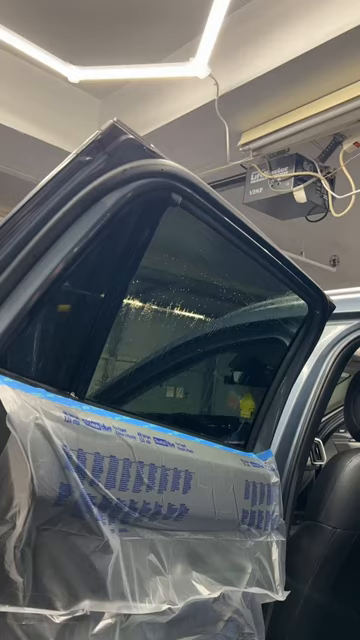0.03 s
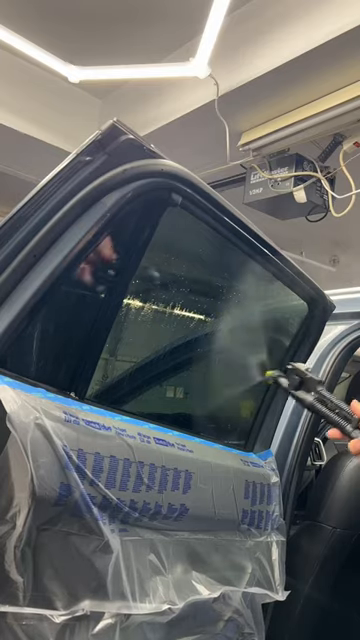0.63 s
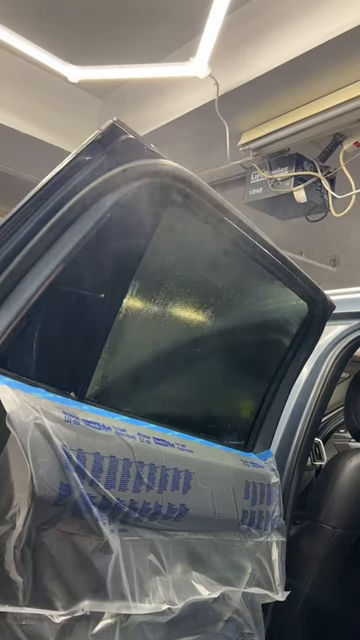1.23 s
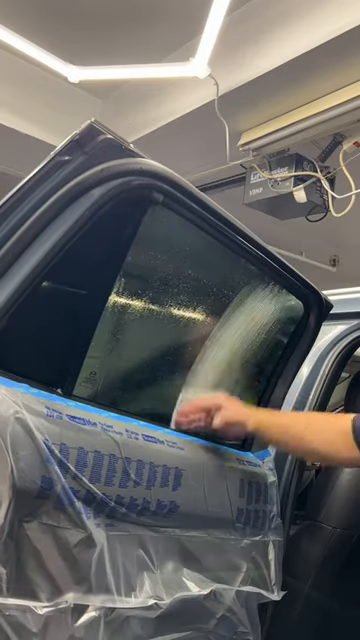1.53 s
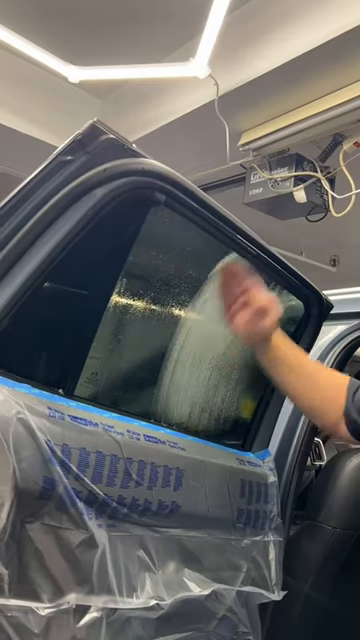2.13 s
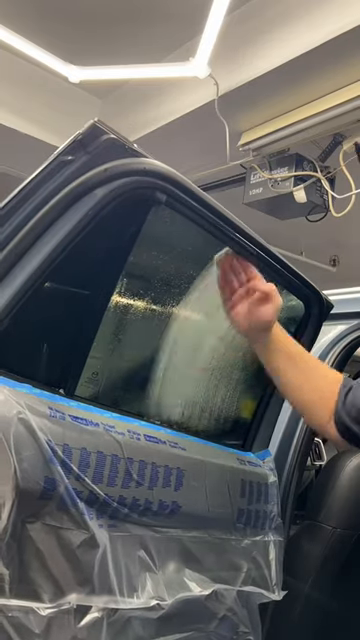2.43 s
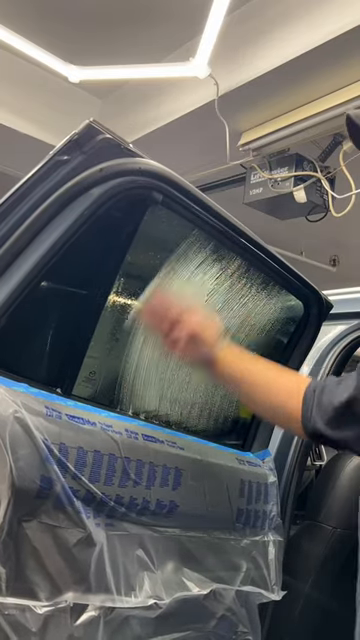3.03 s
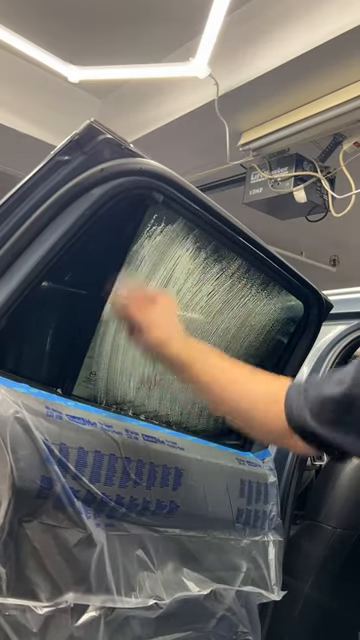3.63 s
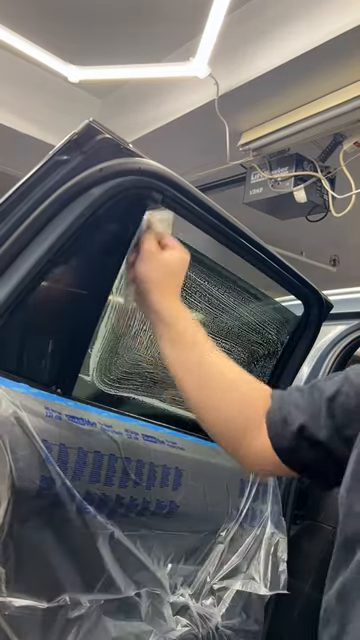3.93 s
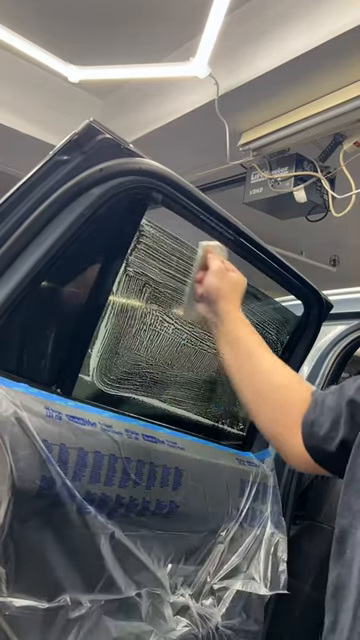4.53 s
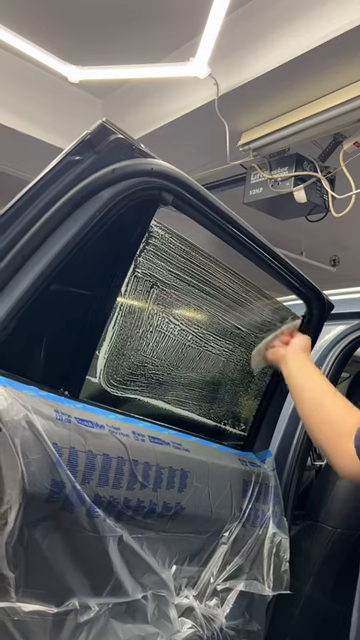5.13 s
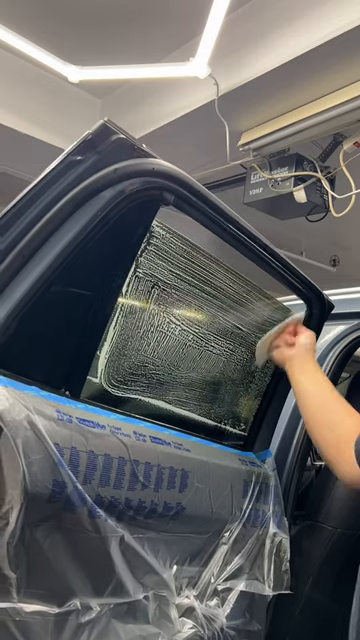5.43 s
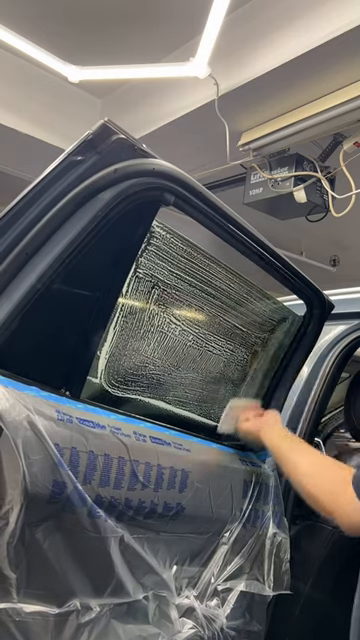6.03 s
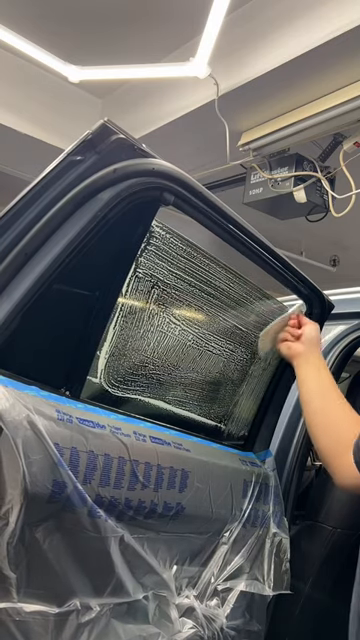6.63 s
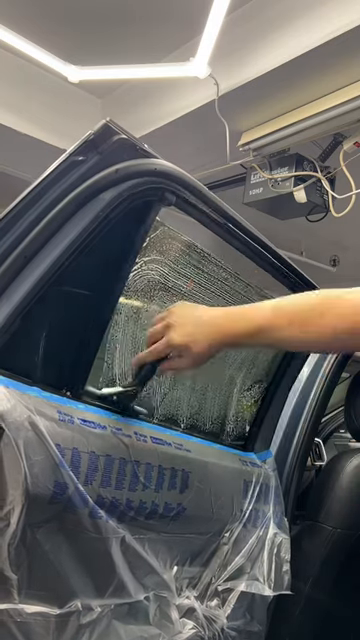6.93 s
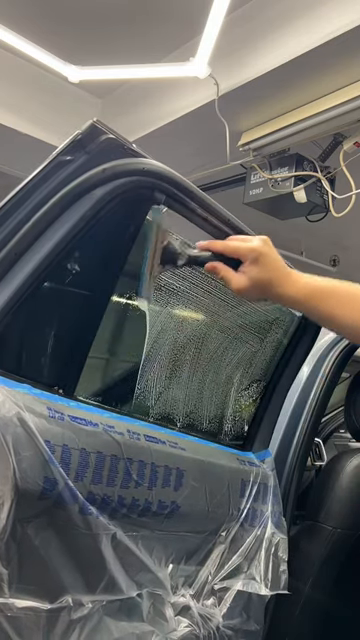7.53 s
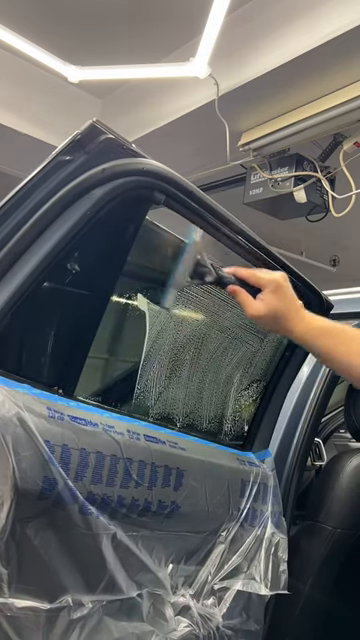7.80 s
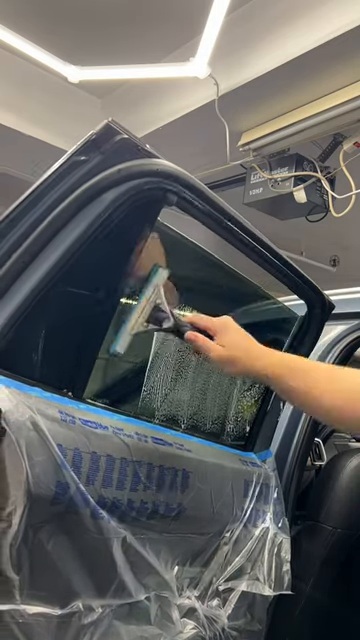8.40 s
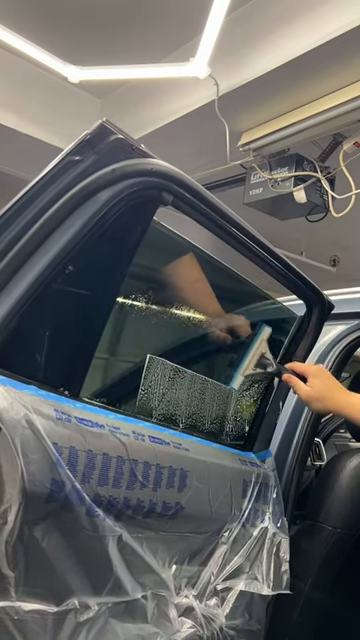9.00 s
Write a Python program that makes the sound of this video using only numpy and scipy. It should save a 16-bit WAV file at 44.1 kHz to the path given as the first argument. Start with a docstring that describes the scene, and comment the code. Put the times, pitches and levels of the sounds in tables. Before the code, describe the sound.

A sprayer hisses on a car window, a pad scrubs and knocks the wet glass, then a rubber squeegee squeaks and chatters over ventilation hum.

```python
"""A soft rustle, then the hiss of a pump sprayer misting a car's side window: a workshop, the phone a metre off.
A pad scrubs the wet pane, knocking the glass at the ends of strokes and fizzing along the seals,
and the door rumbles under the hand. Then a rubber squeegee sticks and slips, squeaking and chattering.
Faint falling whistles, ventilation and mains hum lie underneath; two microphone ports give the stereo."""
import sys
import numpy as np
from scipy import signal
from scipy.fft import rfft, irfft
from scipy.io import wavfile
from scipy.ndimage import uniform_filter1d

SR = 44100
rng = np.random.default_rng(int(sys.argv[2]) if len(sys.argv) > 2 else 0)


def output_pcm(signal):
    """Save a mono or channel-first signal as 16-bit PCM at the path in sys.argv[1].

    Samples are clipped to [-1, 1] before scaling.
    """
    pcm = np.clip(np.atleast_2d(signal).T, -1, 1) * 32767
    wavfile.write(sys.argv[1], SR, np.round(pcm).astype(np.int16))


N = 408366
T = np.arange(N) / SR

# spectra, each (frequency [Hz], relative level [dB])
AIR_COLOUR = [(25, -13), (70, -1.5), (180, -3), (300, -11.5), (500, -15), (750, -21.5), (2100, -25.5),
              (3200, -36.5), (4500, -42.5), (5800, -39.5), (8300, -50.5), (16000, -69)]  # ventilation
MIST_COLOUR = [(120, -18), (200, 0), (330, 0), (650, -5), (1300, -4), (2100, -3), (2700, -6), (3700, -12),
               (5500, -12.5), (7000, -16.5), (8400, -13), (16000, -18)]  # spray on the pane
RUB_COLOUR = [(250, 2), (600, 1.5), (1000, 1), (1550, 2), (1900, -2.5), (2400, -1), (4000, -6),
              (6000, -9.5), (9000, -50)]  # friction on wet glass
FIZZ_COLOUR = [(1500, -25.5), (3200, 0), (4300, 0), (5600, -0.5), (7000, -4), (8400, 1.5), (10000, -20.5),
               (16000, -23.5)]  # tearing soap film
SHAKE_COLOUR = [(20, -28), (40, -12.5), (58, 6.5), (85, 3.5), (120, -6.5), (190, -5), (300, -11),
                (500, -25.5), (1000, -84)]  # door shaking under the hand
BOOM_COLOUR = [(40, -6), (65, 9), (130, 7), (215, -6), (310, -12), (420, 2), (600, -18.5), (1500, -58)]  # hollow door after a knock
TICK_COLOUR = [(200, 2), (600, 14), (1200, 8.5), (2000, 2.5), (3000, -3), (4200, -4.5), (5500, -13),
               (9000, -20), (16000, -39)]  # sharp edge of a knock
SLIP_COLOUR = [(400, 10.5), (1000, -3.5), (1700, 8.5), (2300, 14), (3000, 12), (3900, -7), (4600, -1),
               (5100, 8), (5700, -5.5), (12000, -45)]  # one slip of the rubber lip
JUDDER_COLOUR = [(250, -10), (520, -1.5), (850, -24.5), (1250, 1.5), (1700, 4.5), (2050, -11.5),
                 (2500, -4.5), (3200, -14), (3900, -26), (4600, -21), (8000, -55)]  # resonances of the wet blade
TOP_HISS_COLOUR = [(7500, -30), (11500, 0), (16000, -1)]
RUSTLE_COLOUR = [(500, 9.5), (1400, 4), (2500, -6), (6000, -13.5), (12000, -29)]
DRUMMING_SHARE = [(2800, 5.3), (7000, 1.8)]  # droplets against the mist
AIR_WIDTH = [(60, -16), (250, -23.0), (600, -3.0), (1500, 4.5)]  # side against mid
# mains hum and fan whine: (frequency [Hz], level [dB])
HUM_TONES = [(60, -53.5), (1000, -57), (1479, -57), (1907, -56)]
# shading between the microphone ports: (frequency [Hz], left minus right [dB])
PORT_BALANCE = [(100, 3), (500, -0.1), (1200, 3), (2200, 3), (4200, 3.5), (6000, 7.5), (8000, 1),
                (16000, -0.5)]
# delay between the ports: (frequency [Hz], phase lead of the left [rad])
PORT_PHASE = [(150, -0.12), (600, -0.79), (1400, -0.94), (2700, 0.93), (6000, 1), (8500, 1), (12000, 1)]
# reflections off door, floor, ceiling and car body: (delay [s], level [dB])
REFLECTIONS = [(0.0098, -14.5), (0.022, -20), (.035, -16), (0.048, -23)]
# thin whistles: (start [s], length [s], settled pitch [Hz], level [dB], starts higher by [share])
WHISTLES = [(0.015, 0.051, 2210, -45, 0.047), (0.858, 0.3, 2150, -47.5, 0.31),
            (1.288, 0.1, 2170, -47.5, 0.32), (1.492, 0.13, 2210, -47, 0.18),
            (2.39, 0.13, 2450, -46.5, 0.24), (2.84, 0.11, 4700, -59, 0.072), (3.16, 0.095, 2620, -54, 0.16),
            (3.428, 0.14, 2560, -49, .2), (6.879, 0.15, 2760, -46.5, 0.22),
            (7.043, 0.058, 3610, -49.5, 0.01), (7.113, 0.17, 2710, -44, 0.19),
            (7.461, 0.2, 2686, -45, 0.35), (7.731, 0.28, 3610, -49.5, 0.048), (7.81, 0.17, 2760, -46, 0.24),
            (8.384, 0.24, 2460, -46.5, 0.15)]
# scrubbing along the seals: (start [s], length [s], level [dB], top hiss against that level [dB])
PAD_STROKES = [(3.269, 0.16, -46.5, -5.5), (3.53, 0.13, -46, -1.5), (3.642, 0.19, -42.5, -5),
               (3.828, 0.13, -41, -7.5), (3.987, .14, -40.5, -5.5), (4.219, 0.78, -43, -7.5),
               (5.02, 0.16, -46.5, -26), (5.215, 0.12, -43.5, -20), (5.362, 0.14, -47.5, -28.5),
               (5.514, 0.14, -45, -22.5), (5.687, 0.22, -42, -23), (5.794, 0.17, -31, -4.5),
               (5.984, 0.22, -35.5, -10), (6.284, 0.14, -45.5, -30.5), (6.422, 0.073, -46, -39),
               (6.493, 0.081, -45.5, -38), (6.576, 0.35, -49, -21), (6.692, 0.2, -42.5, -4)]
# the pad groans in the corner of the pane: (start [s], length [s], level [dB])
PAD_GROANS = [(6.611, 0.073, -25), (6.766, 0.011, -18), (6.788, 0.066, -25.5)]
# the pad wedges in the corner and bumps the frame: (time [s], level [dB])
FRAME_BUMPS = [(6.642, -16), (6.652, -25), (6.727, -15)]
# modes of the window frame and of the pane in its door: (frequency [Hz], level [dB], t60 [s])
FRAME_MODES = [(361, 2, 0.12), (438, 0, .14), (545, 4.5, 0.14), (637, -4, 0.1), (1050, -13, .05),
               (1280, -13.5, 0.1), (1474, -12, 0.058)]
PANE_MODES = [(59.6, -5, 0.35), (88, 5, 0.19), (124.2, -2, 0.11), (171, 0.5, 0.3), (219.3, -0.5, 0.24),
              (287.7, -0.5, 0.31), (361, 5.5, 0.065), (427, 2.5, 0.12), (563, 11, 0.037), (1022, -9, 0.091)]
# knocks on the pane: (time [s], level [dB], first pitch [Hz], length [s], tick level [dB])
PANE_KNOCKS = [(1.263, -13, 152, 0.039, -60), (1.423, 1, 338, 0.046, -15.5), (1.459, -5.5, 147, 0.018, -53),
               (1.568, -13.5, 233, 0.068, -26.5), (1.696, -0.5, 451, 0.043, -18),
               (1.735, -1, 158, 0.015, -43), (1.959, 0.5, 434, 0.039, -16.5), (1.998, -3, 168, 0.0091, -36),
               (2.099, -9.5, 318, 0.049, -22.5), (2.231, 0.5, 269.6, 0.044, -19),
               (2.27, -4, 155, 0.013, -38), (2.376, -10.5, 298, 0.043, -22.5),
               (2.509, -1.5, 229, 0.021, -23.5), (2.775, 1.5, 234, 0.015, -23.5),
               (3.052, -0.5, 234, 0.016, -28), (3.478, -11, 434, 0.052, -19.5),
               (4.05, -17.5, 486, 0.035, -47), (5.952, -2.5, 583, 0.016, -12.5),
               (5.959, -2, 391, 0.022, -40), (6.657, -3.5, 360, 0.0099, -59), (6.73, -0.5, 388, 0.015, -41),
               (7.514, -18, 248, 0.054, -34), (9.153, -9, 518, 0.01, -16), (9.163, -13, 336, 0.046, -13.5)]
# pulls of the squeegee: (start [s], length [s], fizz level [dB], rub level [dB])
BLADE_PULLS = [(7.07, 0.343, -49, -55), (7.442, 0.55, -54, -52.5), (7.95, 0.27, -52, -41.5),
               (8.375, 0.315, -52, -39.5), (8.638, 0.567, -55.5, -36), (9.165, 0.11, -58, -38.5)]
# the blade's lip catches and snaps free: (time [s], level [dB])
BLADE_SLIPS = [(7.5037, -35), (8.19, -29), (8.6614, -18.5), (8.7174, -21), (8.737, -16), (8.779, -16),
               (8.813, -21), (8.862, -14.5), (8.904, -23.5), (8.9396, -17), (8.9597, -12), (9.023, -15.5),
               (9.0457, -18)]
# runs of quick slips: (start [s], length [s], level [dB])
BLADE_JUDDERS = [(7.352, 0.033, -39), (8.196, 0.031, -26), (8.216, .03, -28), (8.707, 0.37, -38.5),
                 (8.971, 0.17, -32.5)]
# pad and blade: (start [s], length [s], first pitch [Hz], last pitch [Hz], level [dB], roughness [0-1])
SQUEAKS = [(4.522, .025, 1410, 1265, -40, .12), (4.647, 0.27, 2070, 1967, -51.5, 0.05),
           (5.349, .012, 2640, 2280, -40, .08), (7.348, 0.023, 1850, 1870, -32.5, .03),
           (7.369, 0.07, 1770, 1690, -32.5, 0.08), (7.84, 0.034, 3940, 3840, -38.5, 0.04),
           (8.187, 0.033, 1522, 1583, -24, .06), (8.694, 0.036, 3000, 3060, -33, 0.03),
           (8.717, 0.054, 3050, 2750, -35.5, 0.1), (8.791, 0.038, 2634, 2640, -32, .09),
           (8.832, 0.2, 1707, 1606, -39, 0), (8.979, 0.063, 2530, 2400, -29, 0.13),
           (9.035, .05, 1457, 1500, -33, 0.13), (9.036, 0.047, 2984, 3075, -28, 0.04),
           (9.09, 0.029, 1500, 1445, -26.5, 0.07)]

PAD_ON_S, SPREAD_END_S, PAD_OFF_S = 1.23, 3.66, 6.9  # the pad lands, has spread the soap, lifts off


def undb(db):
    """Decibels to gain."""
    return 10 ** (np.asarray(db) / 20)


def unit(x):
    """Scale to rms 1."""
    return x / np.sqrt(np.mean(x ** 2))


def by_frequency(points):
    """Join (Hz, value) points over all frequencies."""
    hz, value = np.transpose(points)
    return np.interp(np.log(np.fft.rfftfreq(N, 1 / SR) + 1), np.log(hz), value)


def equalise(x, points):
    """Filter x through (Hz, dB) points."""
    return irfft(rfft(x) * undb(by_frequency(points)), N)


def colour(x, points):
    """Give x a spectrum, at rms 1."""
    return unit(equalise(x, points))


def noise(points):
    """Noise with the given spectrum, at rms 1."""
    return colour(rng.standard_normal(N), points)


def lowpass(x, hz):
    """Take off the treble."""
    return signal.sosfilt(signal.butter(2, hz, fs=SR, output="sos"), x)


def walk(hz):
    """Smooth random drift at rms 1, changing about hz times a second."""
    return unit(lowpass(rng.standard_normal(N + SR), hz)[SR:])


def grains(per_s, spread_db):
    """Tiny impacts at random moments, of varying size."""
    hits = rng.random(N) < per_s / SR
    return unit(hits * rng.standard_normal(N) * undb(spread_db * rng.standard_normal(N)))


def crack(grit, t60):
    """A random stretch of the noise grit that starts sharply and dies away."""
    t = T[:SR // 10]
    return np.roll(grit, -rng.integers(N))[:len(t)] * undb(-60 * t / t60) * (1 - np.exp(-t / 0.0002))


def gate(start, end, attack, release):
    """Rise from start, hold, and fall to nothing at end."""
    return np.clip((T - start) / attack, 0, 1) * np.clip((end - T) / release, 0, 1)


def add(track, s, sound):
    """Mix a sound in at time s."""
    i = max(int(s * SR), 0)
    track[i:i + len(sound)] += sound[:max(N - i, 0)]


def ventilation(air_db=-35):
    """Room tone: steady air noise, centred in the bass, with mains hum and a wavering fan whine."""
    mid = noise(AIR_COLOUR)
    side = equalise(noise(AIR_COLOUR), AIR_WIDTH)
    hum = np.zeros(N)
    for hz, db in HUM_TONES:
        pitch = hz * (1 + 0.023 * walk(62.2))
        hum += undb(db) * np.sqrt(2) * np.sin(2 * np.pi * np.cumsum(pitch) / SR)
    return undb(air_db) * (mid + np.array([side, -side])) + hum


def workshop(x, t60=0.11, treble_t60=0.25):
    """Short diffuse echo of the room, different on each side of the microphone."""
    t = T[:SR * 2 // 3]
    white = rng.standard_normal((2, len(t)))
    low = lowpass(white, 2600)
    tail = low * undb(-60 * t / t60) + (white - low) * .5 * undb(-60 * t / treble_t60)
    tail *= np.clip(t / 0.0045, 0, 1)
    tail /= np.sqrt(np.sum(tail ** 2, axis=1, keepdims=True))
    return signal.fftconvolve(x[None], tail, axes=1)[:, :N]


def rustle(db=-38):
    """Soft handling noise before the spray."""
    swell = gate(start=0.029, end=0.344, attack=0.044, release=0.082)
    return undb(db) * swell * noise(RUSTLE_COLOUR) * undb(1.8 * walk(34))


def door(spreading, rubbing, lag_s=0.44):
    """The open door rumbles as the hand works on it, too heavy to follow each stroke."""
    leverage_db = 0.5 * (T - PAD_ON_S)  # grows as the pad climbs the pane
    push = undb(-29 + leverage_db) * spreading + undb(14) * rubbing
    resting = undb(-32.5)
    shake = np.hypot(resting, uniform_filter1d(push, int(lag_s * SR)))
    return noise(SHAKE_COLOUR) * shake * undb(1.43 * walk(14.4) - 2.0)


def frame(contact_s=0.0024):
    """Soft bumps of the pad in the corner ring the window frame with a hollow clunk."""
    out, t = np.zeros(N), T[:SR // 4]
    for s, db in FRAME_BUMPS:
        detune = 1 + .02 * rng.standard_normal(len(FRAME_MODES))
        ring = sum(undb(mode_db - 60 * t / t60) * np.sin(2 * np.pi * hz * d * t)
                   for (hz, mode_db, t60), d in zip(FRAME_MODES, detune))
        add(out, s, undb(db) * ring * (1 - np.exp(-t / contact_s)))
    return out


def flecks():
    """Single drops and bubbles snap brightly out of the wet pad."""
    drops = grains(per_s=70, spread_db=3)
    snaps = signal.fftconvolve(drops, crack(rng.standard_normal(N), t60=.012))[:N]
    return undb(-9) * colour(snaps, [(2000, -21), (5500, 5), (8500, -0.5), (16000, 0)])


def chirps(count=400, per_s=45, centre_hz=2087, spread_oct=.4, t60=0.065):
    """Single pockets of liquid pop under the pad and ring briefly, each at its own pitch."""
    out, t = np.zeros(N), T[:SR // 20]
    ring = undb(-60 * t / t60) * (1 - np.exp(-t / 0.0051))
    chance = rng.standard_normal((count, 2))
    times = PAD_ON_S + np.cumsum(rng.exponential(1, count)) / per_s
    for s, (pitch, size) in zip(times, chance):
        hz = min(centre_hz * 2 ** (spread_oct * pitch), SR / 3)
        add(out, s, undb(2.2 * size) * ring * np.sin(2 * np.pi * hz * t))
    return undb(-9) * unit(out)


def eased(gain, ease_s=0.029):
    """The hand cannot start or stop at once."""
    width = int(ease_s * SR)
    return uniform_filter1d(uniform_filter1d(gain, width), width)


def pad_strokes(resting_db=-60.5, spreading_db=-57):
    """The pad spreads the soap, then scrubs: gains of spreading, fizz, rub and top hiss."""
    spreading = gate(PAD_ON_S, SPREAD_END_S, 0.019, 0.13)
    fizz = undb(resting_db) * gate(PAD_ON_S, PAD_OFF_S, 0.019, .02) + undb(spreading_db) * spreading
    rub, hiss = fizz, undb(-12.5) * fizz
    for s, length, db, hiss_db in PAD_STROKES:
        stroke = undb(db) * gate(s, s + length, attack=0.03, release=0.034)
        fizz = np.maximum(fizz, stroke)
        rub = np.maximum(rub, stroke * undb(-2.5 - 0.39 * hiss_db))  # strokes with more top hiss rub less
        hiss = np.maximum(hiss, stroke * undb(hiss_db))
    return spreading, eased(fizz), eased(rub), eased(hiss)


def blade_pulls(first_db=-7.5):
    """The squeegee speeds up through each pull: gains of fizz and rub."""
    fizz, rub = np.zeros(N), np.zeros(N)
    for s, length, fizz_db, rub_db in BLADE_PULLS:
        speed = undb(first_db * np.clip(1 - (T - s) / (1.01 * length), 0, 1))
        pull = speed * gate(s, s + length, attack=0.03, release=0.029)
        fizz += undb(fizz_db) * pull
        rub += undb(rub_db) * pull
    return fizz, rub


def sliding(fizz_gain, rub_gain, hiss_gain):
    """Fibres catch on the glass and the soap film tears into fizz; both grow with the hand's speed."""
    catches = colour(grains(per_s=7000, spread_db=-2.0), RUB_COLOUR)
    # pockets of liquid ring briefly at a wandering pitch
    pocket_swell = lowpass(rng.standard_normal(N), 86)
    pocket_hz = 1950 * np.exp(0.099 * walk(3.1))
    pockets = unit(pocket_swell * np.sin(2 * np.pi * np.cumsum(pocket_hz) / SR))
    rub = (catches + undb(-14) * pockets) * undb(1.3 * walk(21.0))
    # now and then a bigger bubble snaps
    bubbles = grains(per_s=12000, spread_db=3) + .22 * grains(per_s=30, spread_db=3)
    fizz = colour(bubbles, FIZZ_COLOUR) * undb(1.1 * walk(35) - 0.25)
    # hard strokes add a fine hiss of tiny bursts high in the treble
    hiss = colour(grains(per_s=9000, spread_db=3) + .4 * bubbles, TOP_HISS_COLOUR)
    hiss *= undb(1.2 * walk(30) + walk(5) - .4)
    return rub_gain * rub + fizz_gain * fizz + undb(4.0) * hiss_gain * hiss


def unsteady_tone(s, hz, rough, jitter, grip, flutter_db=4, overtone=0, skew=1):
    """One swelling tone at rms 1: jitter shakes its pitch, grip its level; a skew under 1 bites early."""
    progress = np.arange(len(hz)) / len(hz)
    here = (int(s * SR) + np.arange(len(hz))) % N
    phase = 2 * np.pi * np.cumsum(hz * (1 + rough * jitter[here])) / SR
    wave = np.sin(phase) + overtone * np.sin(2 * phase)
    swell = np.sin(np.pi * progress ** skew) ** .5
    return unit(wave * undb(flutter_db * grip[here]) * swell)


def whistles(jitter, grip, settle_s=.055, creep_per_s=.35, first_rough=.085, settled_rough=.042):
    """Each faint whistle starts high and hoarse and clears as it settles, with a slow upward creep."""
    out = np.zeros(N)
    for s, length, hz, db, higher in WHISTLES:
        t = T[:int(length * SR)]
        unsettled = np.exp(-t / settle_s)
        pitch = hz * (1 + higher * unsettled + creep_per_s * t)
        rough = settled_rough + (first_rough - settled_rough) * unsettled
        add(out, s, undb(db) * unsteady_tone(s, pitch, rough, jitter, grip, flutter_db=3))
    return out


def squeaks(jitter, grip, damp_hz=1810, groan_hz=289.3, groan_rough=0.21):
    """Rubber and pad stick and slip on the glass: high squeaks, and low groans in the corner."""
    out = np.zeros(N)
    for s, length, first_hz, last_hz, db, rough in SQUEAKS:
        glide = np.linspace(first_hz, last_hz, int(length * SR))
        overtone = undb(-13) * min(damp_hz / first_hz, 1) ** 2  # soft rubber damps the higher overtones
        add(out, s, undb(db) * unsteady_tone(s, glide, rough, jitter, grip, overtone=overtone, skew=0.71))
    for s, length, db in PAD_GROANS:
        pitch = np.full(int(length * SR), groan_hz)
        add(out, s, undb(db) * unsteady_tone(s, pitch, groan_rough, jitter, grip, overtone=undb(-10.5)))
    return out


def judder():
    """Runs of uneven slips rasp through the resonances of the wet blade."""
    out = np.zeros(N)
    releases = grains(per_s=900, spread_db=-5)
    slips = signal.fftconvolve(releases, crack(rng.standard_normal(N), t60=0.017))[:N]
    rasp = colour(unit(slips) + grains(per_s=5000, spread_db=1), JUDDER_COLOUR)
    for s, length, db in BLADE_JUDDERS:
        run = rasp[int(s * SR):][:int(length * SR)]
        add(out, s, undb(db) * unit(run * np.hanning(len(run)) ** 0.4))
    return out


def chatter(blade_hz=5250):
    """Single slips of the lip click against the glass and set the blade ringing."""
    out, grit = np.zeros(N), noise(SLIP_COLOUR)
    blade = noise([(0.65 * blade_hz, -25), (blade_hz, 0), (1.27 * blade_hz, -25), (16000, -50)])
    for s, db in BLADE_SLIPS:
        add(out, s - .001, undb(db - 3.5) * crack(grit, t60=.036))
        add(out, s, undb(db - 25) * crack(blade, t60=0.075))
    return out


def sprayer(open_s=0.3368, shut_s=0.7596, db=-21, first_hit_s=0.342, sweep_s=0.1286):
    """The nozzle hisses while the valve is open; droplets drum on the glass."""
    valve = np.clip((T - open_s) / 0.015, 0, 1) * np.exp(-np.maximum(T - shut_s, 0) / 0.0057)
    mist = colour(rng.standard_normal(N) + grains(per_s=12000, spread_db=1), MIST_COLOUR)
    # the drumming swells as the jet hits the pane squarely, once in each sweep of the hand
    drumming = equalise(mist, DRUMMING_SHARE)
    sweep = undb(1.5 * np.cos(2 * np.pi * (T - first_hit_s) / sweep_s))
    return valve * undb(db) * (mist + drumming * (sweep - 1))


def knocks(boom_db=-12, boom_t60=0.57):
    """Each knock sends a bending wave through the pane: high notes come first, then pane and door ring."""
    waves, body, t = np.zeros(N), np.zeros(N), T[:SR // 2]
    grit, smear = noise(TICK_COLOUR), walk(102)
    for s, db, first_hz, length, tick_db in PANE_KNOCKS:
        age = T[:int(length * SR)]
        period_growth = 0.1762 * (length / 0.0536) ** 0.45  # s per s, faster after a longer push
        hz = 1 / (1 / first_hz + period_growth * age)
        swell = np.sin(np.pi * (age / length) ** 0.55) ** 0.79
        # reflections from the pane's edges scramble the wave as it runs
        scramble = np.minimum(age / 0.013, 1) * smear[int(s * SR):][:len(age)]
        wave = undb(db) * swell * np.sin(2 * np.pi * np.cumsum(hz) / SR + scramble)
        tick = undb(tick_db) * crack(grit, t60=0.059)
        # the hand loads the pane at a new place each time and shifts its modes
        detune = 1 + .055 * rng.standard_normal(len(PANE_MODES))
        ring = undb(-60.5) * sum(undb(mode_db - 60 * t / t60) * np.cos(2 * np.pi * mode_hz * d * t)
                                 for (mode_hz, mode_db, t60), d in zip(PANE_MODES, detune))
        add(waves, s, wave)
        add(body, s, signal.fftconvolve(wave, ring))
        add(body, s - .002, tick)
        add(body, s - .002, 2 * signal.fftconvolve(tick, ring))
    body += 0.5 * waves
    hollow_door = noise(BOOM_COLOUR)[:len(t)] * undb(-60 * t / boom_t60)
    boom = undb(boom_db) * np.std(body) * unit(signal.fftconvolve(waves, hollow_door)[:N])
    out, dull = body + boom, lowpass(body, 3800)
    for delay, db in REFLECTIONS:
        add(out, delay, undb(db) * dull)
    # the pane is too small to radiate the deepest bass
    return signal.sosfilt(signal.butter(2, 48, "highpass", fs=SR, output="sos"), out)


def ports(x):
    """The phone's body shades and delays the sound differently at its left and right microphone port."""
    lean = np.sqrt(undb(by_frequency(PORT_BALANCE))) * np.exp(.5j * by_frequency(PORT_PHASE))
    return irfft(rfft(x) * np.array([lean, 1 / lean]), N)


def scene():
    """Work on the glass from a metre away, with the workshop's echo and room tone."""
    spreading, pad_fizz, pad_rub, pad_hiss = pad_strokes()
    blade_fizz, blade_rub = blade_pulls()
    rubbing = pad_rub + blade_rub
    hiss = pad_hiss + undb(-14) * blade_fizz  # top hiss also rises ahead of the blade
    surface = sprayer() + sliding(pad_fizz + blade_fizz, rubbing, hiss)
    jitter, grip = walk(570), walk(87)
    surface += whistles(jitter, grip) + squeaks(jitter, grip) + rustle()
    surface += pad_rub * chirps() + pad_fizz * flecks()
    clicks = chatter() + judder()
    body = knocks() + frame() + door(spreading, rubbing)
    echo = workshop(undb(-5.0) * surface + undb(-5.5) * clicks + undb(-17.5) * body)
    return ports(surface + clicks + body + echo + ventilation())


def record(dry, start_s=.035, top_hz=15900):
    """The phone opens after a moment of silence, rounds the loudest knocks and cuts the top."""
    rounded = dry / (1 + dry ** 6) ** (1 / 6)
    return signal.sosfilt(signal.ellip(10, .2, 70, top_hz, fs=SR, output="sos"), rounded * (T > start_s))


dry = scene()
out = record(dry)
output_pcm(out)
```